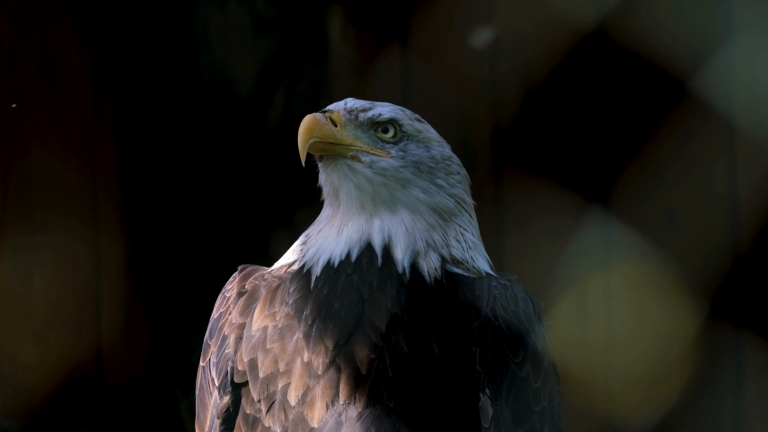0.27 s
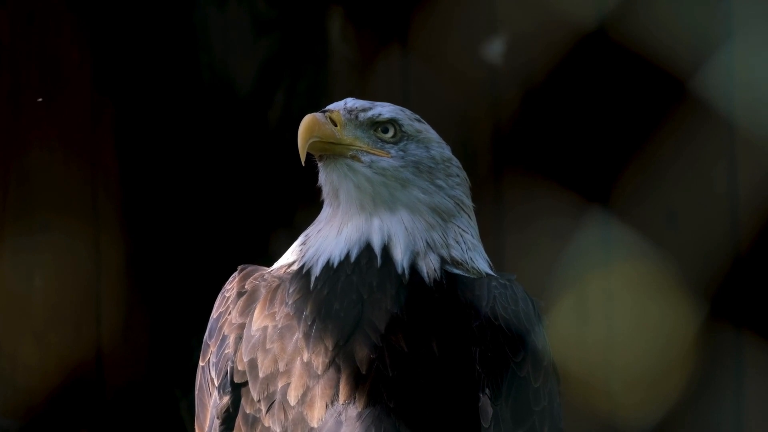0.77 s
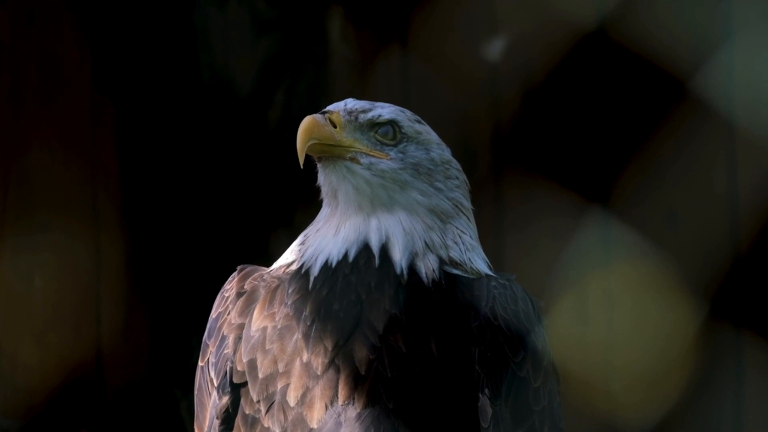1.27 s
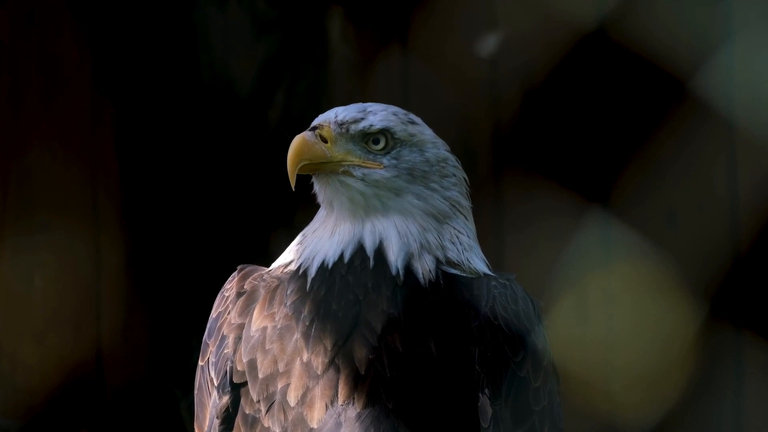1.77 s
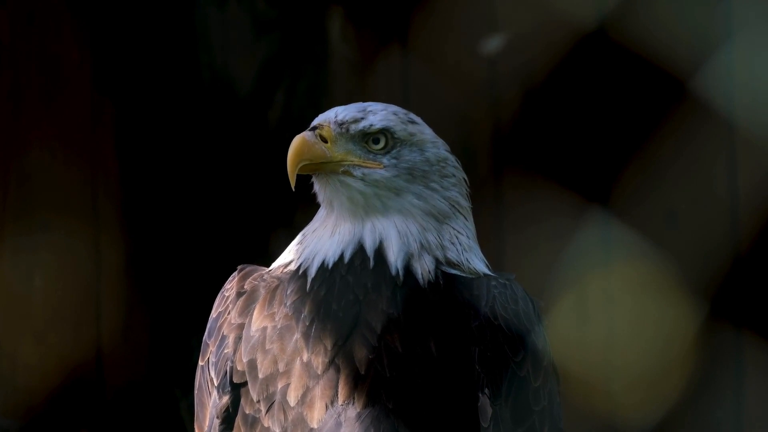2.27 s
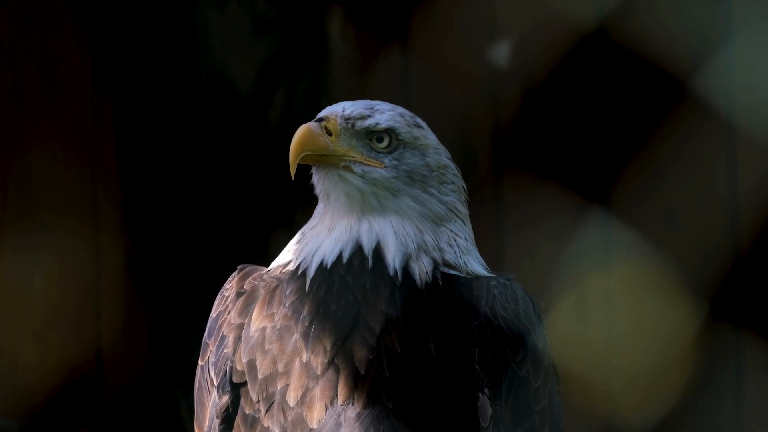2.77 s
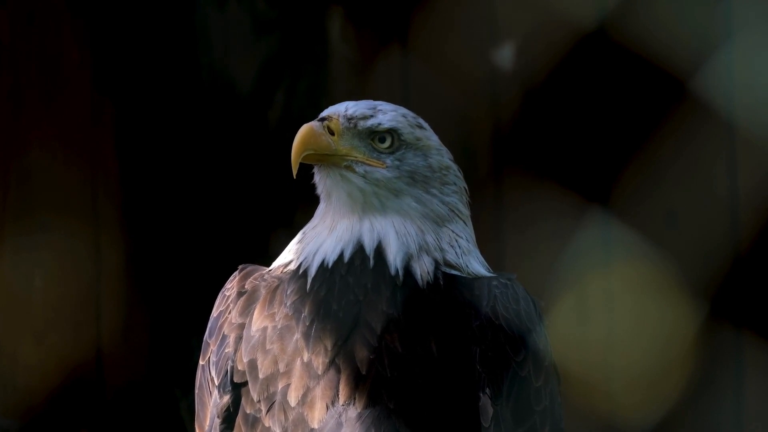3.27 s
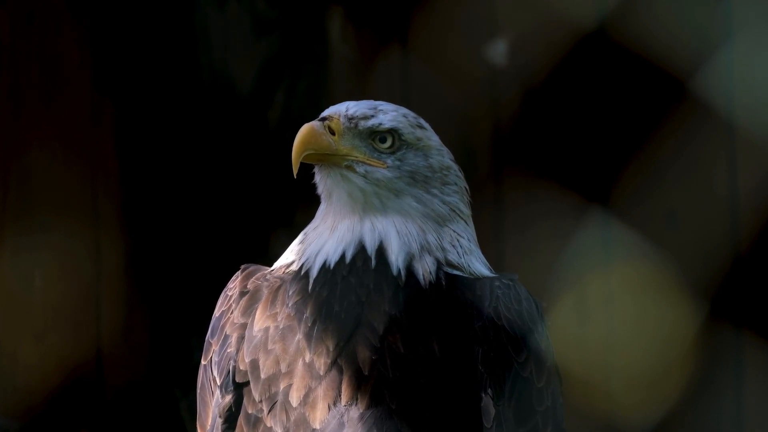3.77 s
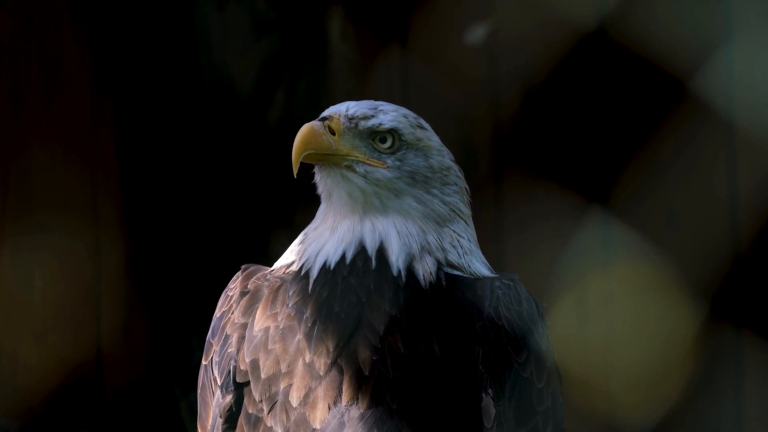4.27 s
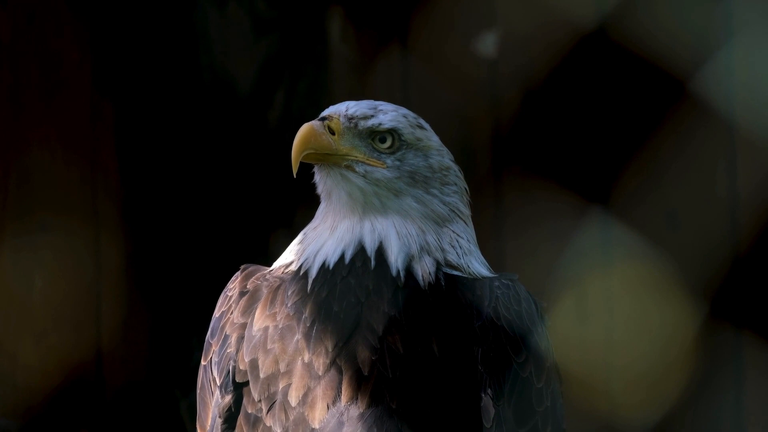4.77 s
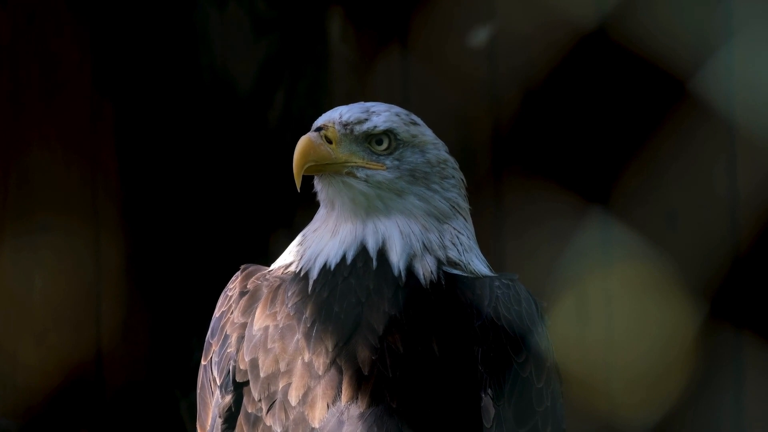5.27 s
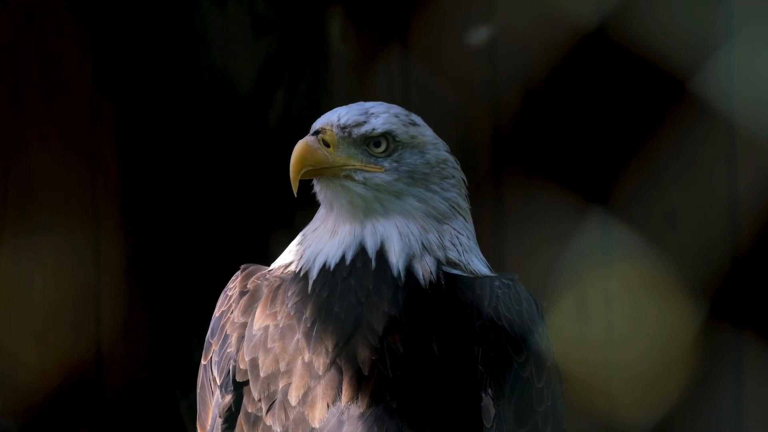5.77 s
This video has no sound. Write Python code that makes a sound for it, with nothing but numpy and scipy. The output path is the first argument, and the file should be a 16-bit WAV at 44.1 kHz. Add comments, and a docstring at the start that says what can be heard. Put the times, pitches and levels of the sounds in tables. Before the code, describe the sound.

An eagle gives five high calls, each a thin whistle breaking into short falling piping notes, over a faint town hum.

```python
"""Town hum lies below from the start. About 1 s in, an eagle gives the first of five calls in the open.
Each starts with both sides of its voice box whistling high and beating against each other over breath,
then breaks into short piping notes that step down. A far wall echoes it; trees add a long thin tail.
Late on, a far vehicle comes in, and a brief soft rustle precedes the last call."""
import sys
import numpy as np
from scipy import signal
from scipy.fft import rfft, irfft
from scipy.io import wavfile
from scipy.ndimage import uniform_filter1d

SR = 44100
rng = np.random.default_rng(int(sys.argv[2]) if len(sys.argv) > 2 else 0)


def int16_out(signal):
    """Quantize to a 16-bit WAV file."""
    q = np.round(np.clip(np.atleast_2d(signal).T, -1, 1) * 32767)
    wavfile.write(sys.argv[1], SR, q.astype(np.int16))


N = 264864


def membrane(strokes, wobble, rough, rasp_db):
    """One side of the voice box: phasor and partial gains. It wavers, rasps, and crackles on fast slides."""
    hz, *partials_db = track(np.concatenate(strokes))
    settle = int(.0015 * SR)
    hz = uniform_filter1d(hz, settle)
    slide = np.clip(np.abs(np.gradient(hz)) * SR / 126000, 0, 1)
    waver = wobble * (band(0, 70) + .48 * band(0, 500)) + .0916 * slide * band(0, 1123)
    phasor = np.exp(2j * np.pi * np.cumsum(hz * (1 + waver)) / SR)
    rasp = (rough + .5 * slide) * band(0, 560) + undb(rasp_db) * band(0, 2700)
    size = np.sqrt(2) * gate(strokes, .0013) * (1 + rasp)
    gains = [size * uniform_filter1d(uniform_filter1d(undb(db), settle), settle) for db in partials_db]
    return phasor, gains


# upper whistle, per stroke; climbs, holds, breaks down: (time [s], pitch [Hz], level [dB])
UPPER_WHISTLE = [
    [(0.958, 3030, -54.5), (0.99, 3720, -58), (1.012, 4450, -63.5), (1.035, 4550, -66),
     (1.065, 5090, -51.5), (1.12, 5180, -37.5), (1.194, 5200, -40.5), (1.208, 4910, -40.5),
     (1.215, 3384, -32), (1.221, 3080, -34), (1.229, 2305, -42.5)],
    [(1.848, 2433, -63), (1.862, 3270, -37), (1.876, 3990, -38), (1.911, 4960, -48), (1.979, 5580, -39.5),
     (2.014, 5574, -36), (2.058, 5710, -44.5), (2.08, 5580, -41.5), (2.114, 5190, -35.5),
     (2.123, 3200, -35.5), (2.131, 2364, -38)],
    [(2.782, 2766, -55.5), (2.797, 3690, -45), (2.823, 6640, -53.5), (2.83, 7040, -82)],
    [(2.848, 6430, -57), (2.876, 5674, -37), (2.92, 5660, -50.5), (2.957, 5570, -40), (2.975, 4950, -37),
     (2.983, 3400, -37), (2.99, 2870, -38)],
    [(3.604, 2760, -47.5), (3.623, 3605, -34), (3.649, 5080, -45), (3.662, 5910, -44.5),
     (3.685, 5620, -41.5), (3.721, 5680, -36), (3.77, 5970, -42.5), (3.862, 5640, -39), (3.871, 4070, -38),
     (3.879, 2940, -24.5)],
    [(4.628, 2520, -60), (4.651, 3550, -46.5), (4.668, 4610, -52.5), (4.68, 5490, -51), (4.71, 5370, -48),
     (4.755, 5660, -41.5), (4.8, 5750, -42), (4.821, 5630, -41.5), (4.834, 3020, -44.5)],
]
# lower whistle, per stroke; dips, climbs to the upper: (time [s], pitch [Hz], level [dB])
LOWER_WHISTLE = [
    [(1.035, 4560, -54), (1.06, 4640, -48), (1.085, 4620, -42.5), (1.112, 4520, -40.5), (1.151, 4450, -47),
     (1.191, 4520, -41), (1.215, 4750, -42)],
    [(1.875, 3920, -38), (1.896, 4590, -46.5), (1.961, 4370, -42), (1.983, 4230, -45.5), (2.011, 4370, -40),
     (2.04, 4590, -44.5), (2.094, 5020, -37)],
    [(2.852, 4450, -60.5), (2.867, 4500, -45.5), (2.886, 4420, -47), (2.937, 4670, -45.5),
     (2.97, 5090, -49)],
    [(3.67, 4550, -51), (3.72, 4460, -41.5), (3.752, 4290, -40.5), (3.78, 4470, -41), (3.805, 4720, -38.5),
     (3.85, 5080, -54.5)],
    [(4.675, 4700, -57.5), (4.711, 4550, -54), (4.76, 4490, -49.5), (4.78, 4640, -48), (4.805, 4980, -49),
     (4.822, 5130, -54)],
]
FLUTTER_DB, FLUTTER_HZ = 3, 45


def whistles():
    """Both sides sound at once and pull on each other, adding sum and difference tones."""
    upper, (upper_gain,) = membrane(UPPER_WHISTLE, wobble=.0043, rough=.12, rasp_db=-18.5)
    lower, (lower_gain,) = membrane(LOWER_WHISTLE, wobble=.00542, rough=.17, rasp_db=-22)
    upper_gain *= flutter(FLUTTER_DB)
    lower_gain *= flutter(FLUTTER_DB)
    coupling = np.sqrt(np.abs(upper_gain * lower_gain))
    differences = undb(-12) * upper ** 2 / lower + undb(-23.5) * lower ** 2 / upper
    differences += undb(-30) * upper ** 3 / lower ** 2
    sums = upper_gain * undb(-32.5) * upper ** 2 + lower_gain * undb(-20.5) * lower ** 2
    sums += coupling * undb(-26) * upper * lower
    screech = sums * (.5 + .41 * band(0, 900))  # smeared by air noise
    return np.imag(upper_gain * upper + lower_gain * lower + coupling * differences + screech)


CATCH_S, SLIP_S, RELEASE_S = .0086, .013, .01
ATTACK_DB, SLIP_DB, RELEASE_DB = 14, 8.5, 18
RISE_FROM_HZ, RISE_S = 3150, .012


def rising_stroke(start_s, swell_s, length_s, top_hz, catch_db, swell_db, sag_db, octave_db):
    """The membrane catches, slips, swells and sags while the pitch settles upwards."""
    t = np.linspace(0, length_s, num=40)
    knees_s = np.maximum.accumulate([0, CATCH_S, SLIP_S, swell_s, length_s - RELEASE_S, length_s])
    knees_db = [catch_db - ATTACK_DB, catch_db, catch_db - SLIP_DB,
                swell_db, swell_db - sag_db, swell_db - sag_db - RELEASE_DB]
    db = np.interp(t, knees_s, knees_db)
    hz = top_hz - (top_hz - RISE_FROM_HZ) * np.exp(-t / RISE_S)
    return np.transpose([start_s + t, hz, db, db + octave_db])


BLOOM_DB, BLOOM_S, WILT_DB, WILT_S = 7, .0054, 11, .0056
FOLLOW_SHARE = .52


def falling_stroke(note, colour):
    """Adds overtone and half-line levels that follow the note's dips, come late and leave early."""
    t, db = np.array(note)[:, :1], np.array(note)[:, 2:]
    *base_db, overtone_growth_db, half_growth_db = colour
    edges_db = BLOOM_DB * np.exp((t[0] - t) / BLOOM_S) + WILT_DB * np.exp((t - t[-1]) / WILT_S)
    progress = (t - t[0]) / (t[-1] - t[0])
    growth_db = (progress - .5) * [overtone_growth_db, overtone_growth_db, half_growth_db]
    return np.hstack([note, base_db + growth_db + FOLLOW_SHARE * (db - db.max()) - edges_db])


# rising note before the falling ones, calls 2-5: (start [s], swell time [s], length [s],
# top pitch [Hz], catch [dB], swell [dB], sag [dB], octave [dB re note])
RISING_NOTES = [(2.126, .018, 0.032, 3990, -23, -33, 6, -47),
                (2.985, 0.023, 0.051, 4040, -25, -27.5, 12, -27),
                (3.875, 0.025, .096, 3739, -27.5, -23, 17, -21.5),
                (4.83, 0.031, 0.1, 3764, -20, -21, 9, -23.5)]
# falling notes, one high and one low per call: (time [s], pitch [Hz], level [dB])
FALLING_NOTES = [
    [(1.222, 3350, -48), (1.228, 3379, -29.5), (1.236, 3295, -35.5), (1.251, 3110, -22.5),
     (1.273, 3050, -42), (1.3, 2933, -21), (1.308, 2855, -27), (1.315, 2540, -21)],
    [(1.316, 2546, -31), (1.325, 2428, -28.5), (1.352, 2340, -23), (1.361, 2264, -29), (1.372, 2291, -40),
     (1.381, 2298, -27.5), (1.387, 2170, -43.5), (1.397, 2080, -30), (1.41, 1893, -58)],
    [(2.148, 3284, -35.5), (2.155, 3200, -28), (2.16, 3010, -32), (2.17, 3000, -18.5), (2.205, 2924, -18),
     (2.215, 2918, -16), (2.232, 2867, -17.5), (2.242, 2790, -20.5), (2.249, 2760, -41)],
    [(2.251, 2614, -26.5), (2.259, 2340, -18.5), (2.266, 2320, -25.5), (2.279, 2264, -30.5),
     (2.285, 2127, -29), (2.305, 1979, -64)],
    [(3.02, 3160, -35), (3.024, 3106, -32.5), (3.028, 3000, -18), (3.037, 2970, -24.5),
     (3.043, 2900, -32.5), (3.06, 2819, -19.5), (3.08, 2809, -18), (3.109, 2742, -24), (3.121, 2630, -27),
     (3.128, 2538, -19.5), (3.132, 2500, -38.5)],
    [(3.134, 2120, -34), (3.143, 1964, -26.5), (3.151, 1916, -50), (3.157, 1840, -48.5)],
    [(3.935, 2940, -38), (3.956, 2920, -38), (3.966, 2844, -26.5), (3.978, 2810, -28), (4.001, 2641, -21)],
    [(4.003, 2460, -35.5), (4.005, 2390, -19.5), (4.008, 2209, -29.5), (4.024, 2095, -24),
     (4.031, 2030, -35.5), (4.045, 1850, -44)],
    [(4.912, 2955, -42), (4.927, 2865, -26), (4.932, 2762, -23), (4.95, 2728, -20), (4.977, 2628, -19),
     (4.986, 2340, -37)],
    [(4.988, 2396, -41.5), (4.994, 2110, -25.5), (4.999, 2100, -29), (5.022, 1778, -47.5)],
]
# base colour per falling note: (octave [dB], twelfth before its noisy gain [dB], half line [dB],
# overtone growth [dB], half-line growth [dB])
FALLING_COLOUR = [(-54.5, -65.5, -69, 22, -2), (-36, -54, -35.5, -16, 9), (-42.5, -63.5, -76.5, -3, -0.5),
                  (-36.5, -53.5, -42, -13, 13), (-36, -58, -52.5, -2, 5), (-41.5, -60.5, -62, -5, -0.5),
                  (-44, -71, -76.5, 2, -1.5), (-29, -49, -68, -2, -0.5), (-43.5, -70, -67, -8, 14),
                  (-38.5, -56, -52, 0, 2)]
# other side humming under the rising note: (start [s], length [s], pitch [Hz], level [dB])
UNDERTONES = [(2.99, 0.048, 2462, -45.5), (3.885, 0.038, 2355, -46), (4.836, .07, 2660, -41.5)]
# half lines, from every second cycle being weaker: (pitch multiple [x], level [dB re half line])
HALF_PARTIALS = [(1 / 2, -3), (3 / 2, 0), (5 / 2, -12), (7 / 2, -17.5), (9 / 2, -24.5)]


def piping():
    """Loud near-sine notes with faint, flickering overtones, half lines and undertone."""
    rises = [rising_stroke(*row) for row in RISING_NOTES]
    falls = list(map(falling_stroke, FALLING_NOTES, FALLING_COLOUR))
    hums = [[(start, hz, db), (start + length, hz, db)] for start, length, hz, db in UNDERTONES]
    rise, (rise_gain, rise_octave) = membrane(rises, wobble=.0017, rough=.016, rasp_db=-25.5)
    fall, (fall_gain, fall_octave, twelfth, half_gain) = membrane(
        falls, wobble=.000952, rough=.023, rasp_db=-47.5)
    hum, (hum_gain,) = membrane(hums, wobble=.02, rough=.67, rasp_db=-31.5)
    for gain in (rise_octave, fall_octave, twelfth, half_gain, hum_gain):
        gain *= flutter(depth_db=3.7)
    phase = np.unwrap(np.angle(fall))
    halves = sum(undb(db) * np.sin(multiple * phase) for multiple, db in HALF_PARTIALS)
    halves *= 1 + .34 * band(0, 320)  # unsteady strong-weak pattern
    top = twelfth * (fall ** 3 + undb(-21) * fall ** 4) * (1.9 + .78 * band(0, 400))
    rising = rise_gain * rise + rise_octave * rise ** 2
    falling = fall_gain * fall + fall_octave * fall ** 2 + top
    undertone = hum_gain * (hum + undb(-19) * hum ** 2)
    return np.imag(rising + falling + undertone) + half_gain * halves


# breath swelling into each break: (start [s], length [s], hiss [dB], break [dB])
BREATH_SWELLS = [(0.974, 0.29, -65.5, -49), (1.848, 0.29, -57, -45), (2.779, 0.21, -58, -47.5),
                 (3.599, .27, -52.5, -48.5), (4.629, 0.21, -63.5, -58)]
# puff ending each call: (start [s], length [s], level [dB])
BREATH_PUFFS = [(1.28, .15, -49.5), (2.24, 0.075, -58), (3.04, .11, -64.5), (3.99, 0.089, -55),
                (4.97, .07, -49)]
# hiss spectrum: (frequency [Hz], relative density [dB])
BREATH_SPECTRUM = [(1500, -9), (3000, 8), (5000, 11.5), (7000, 4), (9000, -3.5), (11000, -18.5)]
ONSET_S, ONSET_DB, SWELL_S, PUFF_FADE_DB = .05, 7.5, .06, 10


def breath():
    """Air hisses unevenly past the membranes while they sound."""
    swells = [[(start, db - ONSET_DB), (start + ONSET_S, db),
               (start + length - SWELL_S, db), (start + length, break_db)]
              for start, length, db, break_db in BREATH_SWELLS]
    puffs = [[(start, db), (start + length, db - PUFF_FADE_DB)] for start, length, db in BREATH_PUFFS]
    strokes = sorted(swells + puffs)
    level_db = track(np.concatenate(strokes))[0] + 2.4 * band(0, 60)
    return coloured(BREATH_SPECTRUM) * undb(level_db) * gate(strokes, .025)


# scatter from trunks and leaves: (centre [Hz], T60 [s], gain [dB])
TREE_BANDS = [(2150, 1.9, -31.5), (3800, 1.97, -32), (7000, 2.2, -32.5)]
NEAR_HZ, NEAR_T60_S, NEAR_DB = 3900, .08, -27


def trees(bird):
    """Quick returns from nearby ground and branches, then a long scattered tail."""
    t = np.arange(int(1.5 * SR)) / SR
    tail = 0
    for hz, t60_s, db in TREE_BANDS + [(NEAR_HZ, NEAR_T60_S, NEAR_DB)]:
        fade = np.exp(-np.log(1000) * t / t60_s) * np.clip(t / (t60_s / 40), 0, 1)
        tail += undb(db) * band(hz, hz / 1.16)[:len(t)] * fade / np.sqrt(np.sum(fade ** 2))
    clumps = undb(4 * band(0, 25)[:len(t)])  # stands of trees return sound in patches
    return signal.fftconvolve(bird, tail * clumps)[:N]


# share thrown at the wall as the head turns: (time [s], gain [dB])
WALL_SEND = [(1.2, -37), (2.1, -24), (3.0, -60), (3.9, -13), (4.9, -8.5)]
# treble beamed at the wall by the beak: (frequency [Hz], gain [dB])
BEAK_BEAM = [(1500, -10), (2100, -2.5), (2750, -11.5), (3750, -7), (5500, 4), (7500, -3), (11000, -4.5)]
ECHO_S, REPEAT_DB = .155, -16


def wall(bird):
    """A far wall's echo comes round twice, blurred by its rough face."""
    hz = np.arange(N // 2 + 1) * SR / N + 1
    sent = bird * undb(track(WALL_SEND)[0])
    beamed = irfft(rfft(sent) * curve_gain(hz, BEAK_BEAM), N)
    lag = int(ECHO_S * SR)
    echo = np.roll(beamed, lag) * (1 + .35 * band(0, 140))
    return echo + undb(REPEAT_DB) * np.roll(echo, lag)


# steady narrow drones: (centre [Hz], width [Hz], level [dB])
DRONES = [(220.4, 18, -72), (567.7, 71, -60), (1135, 84, -67)]
# swelling low drone: (time [s], level [dB])
LOW_DRONE_LEVEL = [(0, -62.5), (2.2, -77.5), (2.6, -57), (4.4, -61), (4.8, -65)]
# far vehicle: (time [s], level [dB])
VEHICLE_LEVEL = [(3.8, -68), (4.5, -60), (5.08, -59), (5.14, -53), (5.25, -54), (5.32, -60), (6.0, -64)]
# leaves or feathers: (time [s], level [dB])
RUSTLE_LEVEL = [(4.36, -74), (4.478, -63), (4.6, -80)]
# broad town hum: (frequency [Hz], relative density [dB])
TOWN_SPECTRUM = [(15, -53.5), (25, -12), (58, 0.5), (145, -6.5), (178, -6.5), (208, -3.5), (425, -12),
                 (563, -10.5), (608, -10), (1690, -13.5), (3450, -27), (3820, -32), (11200, -51),
                 (14500, -109), (22000, -120)]
TOWN_DB = -50.5


def town():
    """Broad hum with narrow drones, a far vehicle and a brief rustle."""
    drones = sum(undb(db) * band(hz, width_hz) for hz, width_hz, db in DRONES)
    drones += band(104, 8.7) * undb(track(LOW_DRONE_LEVEL)[0])
    vehicle = band(970, 290) * undb(track(VEHICLE_LEVEL)[0]) * gate([VEHICLE_LEVEL], .31)
    rustle = band(5600, 7100) * undb(track(RUSTLE_LEVEL)[0]) * gate([RUSTLE_LEVEL], .04)
    return undb(TOWN_DB) * coloured(TOWN_SPECTRUM) + drones + vehicle + rustle


def undb(db):
    return 10 ** (np.asarray(db) / 20)


def track(rows):
    """Columns after time, interpolated per sample."""
    times, *columns = np.transpose(rows)
    return [np.interp(np.arange(N) / SR, times, column) for column in columns]


def gate(strokes, edge_s):
    """1 during any stroke, soft edges."""
    t = np.arange(N) / SR
    on = np.any([(t >= rows[0][0]) & (t <= rows[-1][0]) for rows in strokes], axis=0)
    return uniform_filter1d(on * 1., int(edge_s * SR))


def curve_gain(hz, points):
    """Gain of a dB curve over log frequency."""
    knees_hz, db = np.transpose(points)
    return undb(np.interp(np.log(hz), np.log(knees_hz), db))


def shaped(gain):
    """Unit-rms noise with spectrum gain(hz)."""
    hz = np.arange(N // 2 + 1) * SR / N + 1e-3
    noise = irfft(rfft(rng.standard_normal(N)) * gain(hz), N)
    return noise / np.sqrt(np.mean(noise ** 2))


def coloured(points):
    return shaped(lambda hz: curve_gain(hz, points))


def band(centre_hz, width_hz):
    return shaped(lambda hz: 1 / (1 + (2 * (hz - centre_hz) / width_hz) ** 2))


def flutter(depth_db):
    return undb(depth_db * band(0, FLUTTER_HZ))


def scene():
    bird = whistles() + piping() + breath()
    return (bird + trees(bird) + wall(bird) + town())[None]


CUTOFF_HZ = 11000


def record(dry):
    """The recorder cuts the top."""
    return signal.sosfilt(signal.ellip(8, .2, 60, CUTOFF_HZ, fs=SR, output="sos"), dry)


dry = scene()
out = record(dry)
int16_out(out)
```